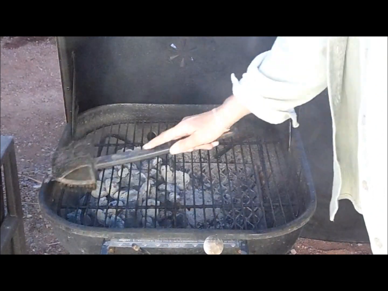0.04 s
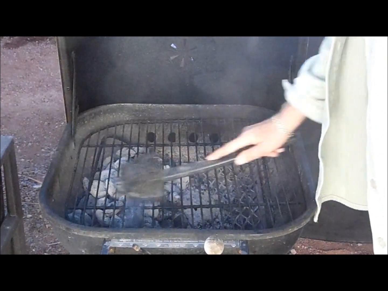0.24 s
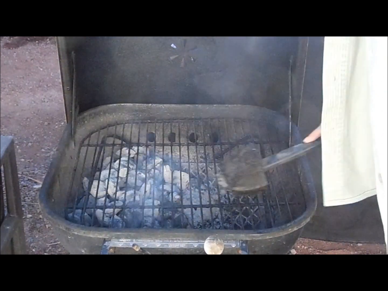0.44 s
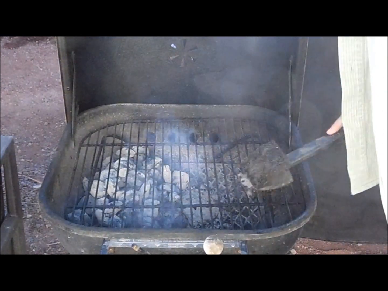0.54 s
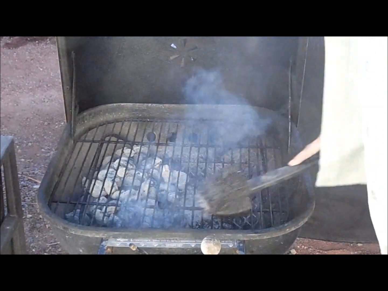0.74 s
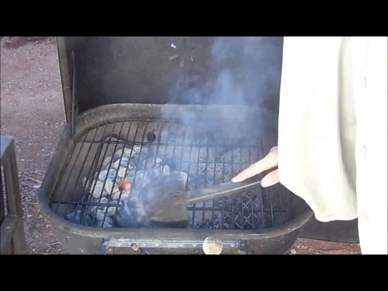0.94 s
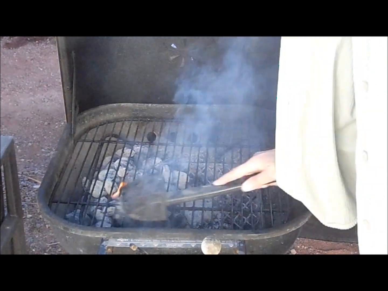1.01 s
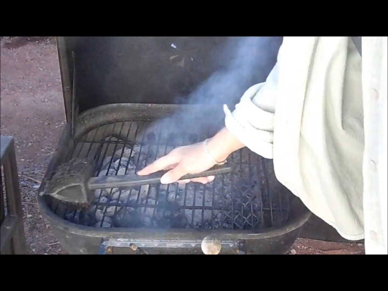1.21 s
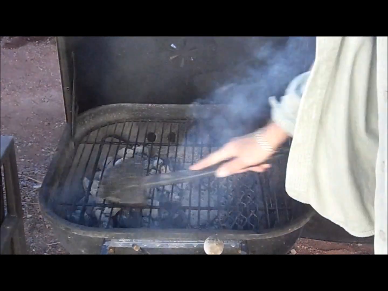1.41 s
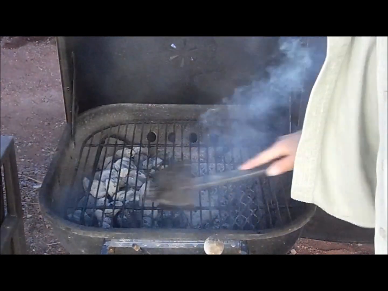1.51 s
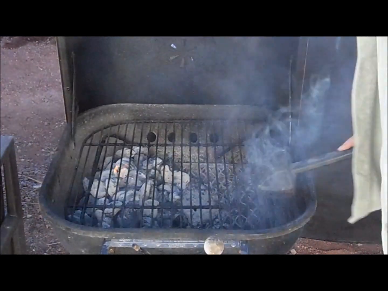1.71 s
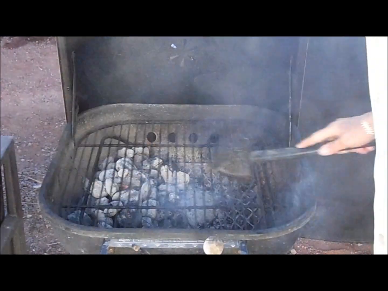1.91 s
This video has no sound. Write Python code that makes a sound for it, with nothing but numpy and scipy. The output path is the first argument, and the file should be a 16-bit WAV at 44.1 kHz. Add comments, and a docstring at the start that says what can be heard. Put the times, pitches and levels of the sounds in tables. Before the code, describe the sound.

A wire brush scrapes a metal grill grate in three short, crunchy strokes.

```python
"""Outdoors, light wind buffets the microphone. From 0.2 s a wire brush is pushed back and forth
over the grate of a charcoal grill in three strokes. In each, the bristles hiss along the bars,
and crunch where tufts catch and spring free. At the turns (near 0.3, 0.8, 1.3 and 1.6 s) the head
judders by stick-slip friction and the steel bowl booms in its modes. At 1.7 s one bar sings as
the brush leaves it; the ringing dies away into the breeze and a distant hum."""
import sys
import numpy as np
from scipy import signal
from scipy.fft import rfft, irfft
from scipy.io import wavfile
from scipy.ndimage import uniform_filter1d

SR = 44100
rng = np.random.default_rng(int(sys.argv[2]) if len(sys.argv) > 2 else 0)


def transcribe(u):
    """Save the signal u as a 16-bit wav file named by the first command-line argument.

    u: samples, shape (n,) or (channels, n), limited to [-1, 1]; the rate is SR.
    q: integer samples, one column per channel.
    """
    v = np.clip(np.atleast_2d(u).T, -1, 1)
    q = np.round(v * 32767).astype(np.int16)
    wavfile.write(sys.argv[1], SR, q)


N = 85995
TIME = np.arange(N) / SR

# glides along the bars: start t/s, end t/s, level/dB, decay t/s, relative bowl drive/dB
STROKES = [(0.198, 0.512, -44.5, 0.068, 0.5), (0.75, 1.337, -48, 0.072, 0.5), (1.464, 1.763, -47, 0.039, 0)]
# tufts that catch: onset t/s, crunch level/dB, sizzle level/dB, hold t/s, decay t/s
CATCHES = [(0.179, -44, -56.5, 0.022, 0.013), (0.198, -28.5, -45, 0.015, 0.034),
           (0.2011, -22.5, -20, 0.0012, 0.0072), (0.248, -33, -50, 0.0073, 0.0087),
           (0.2676, -30.5, -35.5, 0.016, 0.01), (0.2987, -30.5, -35.5, 0.0082, 0.025),
           (0.734, -61, -58, 0.0044, 0.011), (0.7496, -34, -50, 0.0025, 0.013),
           (.763, -35, -46.5, 0.0044, 0.023), (0.805, -25.5, -59, 0.026, 0.029),
           (0.813, -33, -32.5, 0.0078, .015), (0.8275, -51, -30.5, 0.012, 0.029),
           (0.8645, -52, -34.5, 0.0033, 0.014), (1.294, -44, -49, 0.01, 0.031),
           (1.302, -39, -37, 0.0081, 0.0075), (1.319, -37.5, -39, 0.0036, 0.007),
           (1.335, -40.5, -38.5, 0.0039, 0.015), (1.572, -38.5, -57, 0.01, 0.034),
           (1.595, -27, -61, 0.015, 0.021), (1.6037, -29.5, -20, 0.0012, 0.0029),
           (1.609, -21, -27, 0.0024, 0.01), (1.624, -42, -37.5, 0.016, 0.017),
           (1.655, -38.5, -43, 0.013, 0.025)]
# spectra of the bristle noise: f/Hz, relative level/dB
GLIDE_SPECTRUM = [(200, 7), (500, -15), (1000, 4.5), (1600, -4), (3000, -5), (4800, -10.5), (7000, -11),
                  (11000, -11.5), (16000, -18.5)]
CRUNCH_SPECTRUM = [(150, -4.5), (300, -3), (550, 4), (800, 4), (1500, -1), (2600, -0.5), (4000, -7.5),
                   (7000, -13), (16000, -42)]
SIZZLE_SPECTRUM = [(1000, -96.5), (3000, -4), (5000, 1.5), (7500, 2), (10000, 3.5), (13500, -0.5),
                   (16000, -9)]
# resonances of the grate's bars and the brush's wires: f/Hz, bandwidth/Hz, relative gain/dB
BAR_RESONANCES = [(881, 50, 1), (1046, 45, -2), (1317, 22, 0), (1619, 32, 5), (2150, 45, 0), (2240, 50, 2),
                  (2370, 40, -2), (2560, 27, 2), (2654, 20, 1), (3080, 120, 0), (3230, 50, 5),
                  (3431, 38, 4), (4040, 100, -3)]
WIRE_RESONANCES = [(4550, 50, -1), (6380, 110, 0), (6870, 48, 0), (7200, 120, 1), (7470, 60, 4),
                   (7950, 50, -1), (8391, 38, 2), (8880, 48, 1), (9210, 30, 2), (10100, 90, -4)]
# judders of the head: onset t/s, force level/dB, length t/s, slip rate/Hz, bowl drive/dB,
# place (0 back of the grate, 1 front), contact cutoff f/Hz
JUDDERS = [(.2695, -24, 0.0045, 187, -2, 0.41, 900), (0.292, -24.5, 0.012, 268, 2.5, 0.29, 300),
           (.81, -15.5, 0.025, 262, -7.5, 1, 980), (.874, -23.5, 0.0047, 317, -14, 0, 400),
           (1.302, -23, 0.012, 290, -2, 0.67, 212), (1.498, -41, 0.019, 506, -5, .5, 1500),
           (1.598, -26.5, 0.0013, 246, -18, 0, 695), (1.604, -16, 0.0088, 241.6, -2, 0.18, 1290),
           (1.626, -27, 0.0086, 283, 13, 0.3, 354)]
# modes of the brush head on the grate: f/Hz, level/dB, T60/s
HEAD_MODES = [(265.3, -4, 0.068), (397, -2.5, 0.029), (467, -8.5, 0.15), (472, -9, 0.027),
              (565, -13.5, 0.15), (820, -31, 0.014)]
# modes of the bowl: f/Hz, level/dB, T60/s, gain when struck at the front/dB
BOWL_MODES = [(94.2, -15.5, 0.29, -5), (115, -16.5, .35, -10), (186.2, -21, 0.52, 1.5),
              (245.3, -11, 0.64, -9.5), (266.4, -21, 0.74, 4.5), (282.5, -25, 0.68, 9),
              (333, -11, 0.16, -12.5), (421.7, -19.5, 0.12, -1.5), (445.4, -19, 0.16, 2.5),
              (543.7, -24.5, 0.6, 2), (574, -29.5, 0.19, 8), (599.6, -31, .3, 3),
              (623.6, -29.5, 0.32, 10.5), (667, -29, 0.21, 6.5), (807, -29, 0.82, -22.5)]
# countless weaker modes of bowl and lid: f/Hz, relative level/dB
WASH_SPECTRUM = [(120, -3), (250, -6.5), (350, 14), (560, -1), (750, 18), (1000, 2.5), (1500, -2),
                 (2500, 7), (4000, -25), (12000, -43)]
# puffs of wind on the microphone: peak t/s, level/dB, half-length t/s
PUFFS = [(0.119, -34.5, 0.02), (0.204, -20, 0.012), (0.301, -26.5, 0.08), (0.372, -22, 0.0084),
         (.436, -18, 0.0087), (0.521, -25, 0.017), (.595, -29.5, .02), (0.641, -27.5, 0.045),
         (0.769, -30, 0.024), (0.895, -24.5, .018), (0.943, -39, 0.046), (1.137, -25.5, 0.034),
         (1.233, -34, 0.036), (1.321, -29, 0.036), (1.418, -30.5, 0.0038), (1.925, -42, 0.015)]
# the breeze between the puffs: t/s, level/dB
BREEZE = [(0, -23.5), (.15, -66.5), (.4, -27), (.72, -40.5), (1.0, -40), (1.35, -57), (1.52, -70),
          (1.95, -47)]
# spectra of the wind and of the distant hum and hiss: f/Hz, relative level/dB
WIND_SPECTRUM = [(12, -10), (28, -2.5), (55, 1), (85, -5), (130, -11), (200, -21.5), (400, -50),
                 (1000, -97)]
AIR_SPECTRUM = [(30, 5.5), (200, -1.5), (260, 5.5), (330, -14), (500, -4), (1000, -11), (1500, -11),
                (2000, -17.5), (2600, -23.5), (3500, -25), (8000, -29), (16000, -31)]


def gliding_bristles(half_rise_s=0.033, to_bowl_db=-12.5):
    """Sliding friction: thousands of tiny impacts merge into a hiss and keep the bowl humming."""
    grains = clicks(per_s=9000, spread_db=2) * flutter(rate_hz=60.2, spread_db=0.8)
    pressure, drive = 0, 0
    for start, end, db, decay, bowl_db in STROKES:
        hold = end - start + half_rise_s
        stroke = from_db(db) * envelope(start - half_rise_s, 2 * half_rise_s, hold, decay)
        pressure += stroke
        drive += stroke * from_db(bowl_db + to_bowl_db)
    hiss = pressure * colour(grains, GLIDE_SPECTRUM)
    force = butterworth(drive * grains, 2, 164, "high")
    return bars_and_wires(hiss) + ring(force, bowl_modes(place=0.61))


def catching_tufts(rise_s=0.00066, to_bowl_db=-28):
    """Elastic release: a caught tuft lets go in a shower of clicks; bars crunch and wires sizzle."""
    crunch_power, sizzle_power = 0, 0
    for start, crunch_db, sizzle_db, hold, decay in CATCHES:
        shape = envelope(start, rise_s, hold, decay)
        crunch_power += (from_db(crunch_db) * shape) ** 2  # incoherent sources add in power
        sizzle_power += (from_db(sizzle_db) * shape) ** 2
    crunch = np.sqrt(crunch_power) * colour(clicks(per_s=4500, spread_db=2.5), CRUNCH_SPECTRUM)
    sizzle_level = np.sqrt(sizzle_power) * flutter(rate_hz=150, spread_db=1.15)
    sizzle = sizzle_level * colour(clicks(per_s=4500, spread_db=2.5), SIZZLE_SPECTRUM)
    boom = from_db(to_bowl_db) * ring(crunch, bowl_modes(place=0.34))
    return bars_and_wires(crunch + sizzle) + boom


def juddering_head(slip_count=14, jitter_periods=0.04, grit_db=-20.5):
    """Stick-slip friction: a short, gritty run of blows excites the modes of brush head and bowl."""
    out = np.zeros(N)
    grit = from_db(grit_db) * butterworth(rng.standard_normal(N), 2, (299, 559), "band")
    for start, db, length, rate, bowl_db, place, contact_hz in JUDDERS:
        periods = np.abs(np.arange(slip_count) + jitter_periods * rng.standard_normal(slip_count))
        slips = np.zeros(N)
        slips[((start + periods / rate) * SR).astype(int) + 1] = 1
        grip = (TIME >= start) * np.exp(-np.minimum(np.abs(TIME - start) / length, 3) ** 4)
        force = from_db(db) * grip * (slips + grit)
        force = butterworth(force + 1e-18, 1, contact_hz, "low")  # a soft contact is duller
        out += ring(force, HEAD_MODES) + from_db(bowl_db) * ring(force, bowl_modes(place))
    return butterworth(out, 2, 75, "high")


def bars_and_wires(noise, ringing_db=-2):
    """Resonance: bars and wires each reinforce a narrow band of the bristle noise."""
    out = noise.copy()
    for hz, width, db in BAR_RESONANCES + WIRE_RESONANCES:
        radius = np.exp(-np.pi * width / SR)
        band = (1 - radius ** 2) / 2 * signal.lfilter([1, 0, -1], poles(hz, radius), noise + 1e-18)
        out += from_db(db + ringing_db) * band
    return out


def bowl_modes(place):
    """Mode shapes: the place of contact sets how strongly each mode of the bowl is driven."""
    return [(hz, db + place * front_db, t60) for hz, db, t60, front_db in BOWL_MODES]


def sheet_metal_wash(drive, t60_s=0.62, gain_db=-9.5):
    """Modal overlap: the dense modes of bowl and lid respond like a burst of decaying noise."""
    response = colour(rng.standard_normal(N), WASH_SPECTRUM) * from_db(-60 * TIME / t60_s)
    response /= np.sqrt(np.mean(np.abs(rfft(response))[400:2000] ** 2))  # unit gain over 0.2-1 kHz
    return from_db(gain_db) * signal.fftconvolve(drive, response)[:N]


def singing_bar(hz=2159, level_db=-55):
    """Frictional excitation: one mode of a rubbed bar swells into a thin tone and rings out."""
    swell = envelope(start=1.71, rise=0.1, hold=0.16, decay=0.055)
    return from_db(level_db) * swell * np.sin(2 * np.pi * hz * TIME)


def wind():
    """Turbulence: eddies at the microphone make a low rumble that follows breeze and puffs."""
    gusts = from_db(np.interp(TIME, *np.transpose(BREEZE)))
    for peak, db, half_length in PUFFS:
        gusts += from_db(db) * np.exp(-((TIME - peak) / half_length) ** 2)
    eddies = colour(rng.standard_normal(N), WIND_SPECTRUM)
    local_power = uniform_filter1d(uniform_filter1d(eddies ** 2, size=1300), size=700)
    return gusts * eddies / np.sqrt(local_power)


def distant_air(air_db=-51.5, whine_hz=12932, whine_db=-69):
    """Stationary background: broadband hum and hiss, with a faint high pure tone."""
    air = from_db(air_db) * colour(rng.standard_normal(N), AIR_SPECTRUM)
    return air + from_db(whine_db) * np.sin(2 * np.pi * whine_hz * TIME)


def clicks(per_s, spread_db):
    """Shot noise: single bristles click at random times with uneven strength; rms 1."""
    sizes = from_db(spread_db * np.minimum(rng.exponential(1, N), 4)) * rng.choice([-1, 1], N)
    return unit_rms(sizes * (rng.random(N) < per_s / SR))


def ring(force, modes):
    """Modal superposition: a unit impulse starts each mode as a damped sine at its level."""
    out = np.zeros(N)
    for hz, db, t60 in modes:
        radius = from_db(-60 / (t60 * SR))
        numerator = [0, np.sin(2 * np.pi * hz / SR)]
        out += from_db(db) * signal.lfilter(numerator, poles(hz, radius), force + 1e-18)
    return out


def poles(hz, radius):
    """Feedback terms of a damped oscillator whose amplitude is multiplied by radius each sample."""
    return [1, -2 * radius * np.cos(2 * np.pi * hz / SR), radius ** 2]


def envelope(start, rise, hold, decay):
    """Linear rise, then exponential decay once the hold, counted from the start, is over."""
    age = TIME - start
    return np.clip(age / rise, 0, 1) * np.exp(-np.maximum(age - hold, 0) / decay)


def flutter(rate_hz, spread_db):
    """Random amplitude modulation: a gain that wanders about 1."""
    return from_db(spread_db * np.interp(TIME * rate_hz, np.arange(N), rng.standard_normal(N)))


def colour(noise, spectrum):
    """Spectral shaping of a steady noise; rms 1."""
    hz, db = np.transpose(spectrum)
    freqs = np.maximum(np.fft.rfftfreq(N, 1 / SR), 1)
    gain = from_db(np.interp(np.log(freqs), np.log(hz), db))
    return unit_rms(irfft(rfft(noise) * gain, N))


def butterworth(x, order, hz, kind):
    """Filter with a maximally flat passband."""
    return signal.sosfilt(signal.butter(order, hz, kind, fs=SR, output="sos"), x)


def unit_rms(x):
    """Normalisation to unit power."""
    return x / np.sqrt(np.mean(x ** 2) + 1e-20)


def from_db(db):
    """Level to amplitude ratio."""
    return 10 ** (np.asarray(db) / 20)


def scene():
    """Superposition: brush, grill and weather add at one microphone."""
    scraping = gliding_bristles() + catching_tufts()
    judder = juddering_head()
    wash = sheet_metal_wash(scraping + from_db(-3) * judder)
    return (scraping + judder + wash + singing_bar() + wind() + distant_air())[None]


def record(dry):
    """Soft saturation rounds the loudest peaks; a steep low-pass limits the bandwidth."""
    ceiling, cutoff_hz = 0.58, 15750
    rounded = dry / (1 + (dry / ceiling) ** 6) ** (1 / 6)
    return signal.sosfilt(signal.ellip(10, 0.2, 80, cutoff_hz, fs=SR, output="sos"), rounded)


dry = scene()
out = record(dry)
transcribe(out)
```